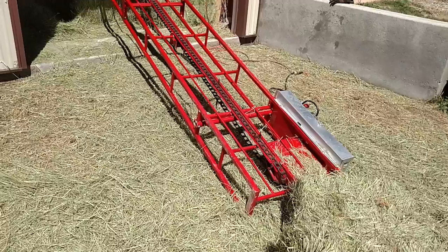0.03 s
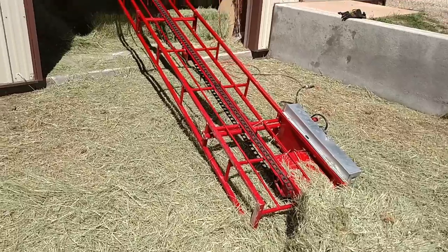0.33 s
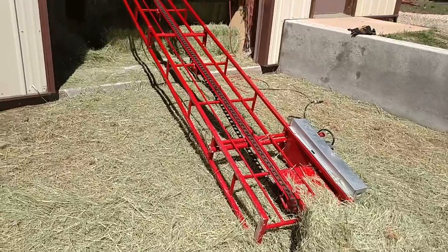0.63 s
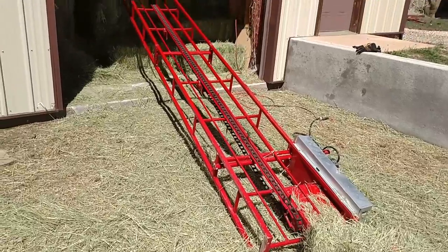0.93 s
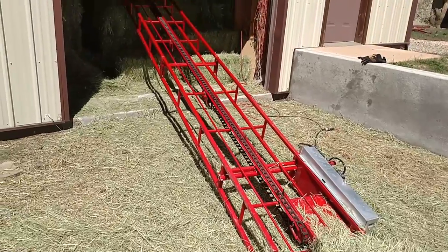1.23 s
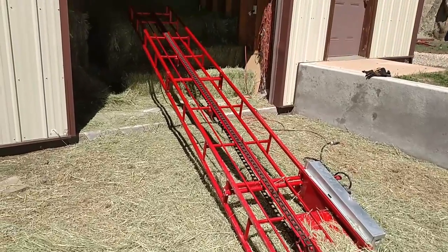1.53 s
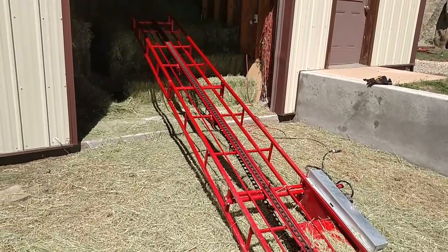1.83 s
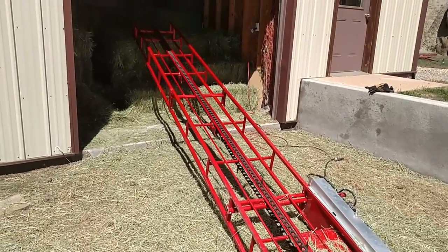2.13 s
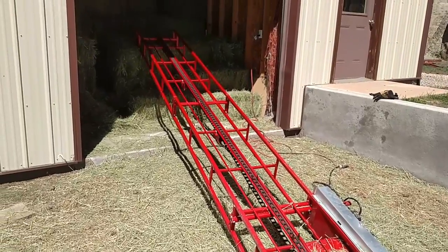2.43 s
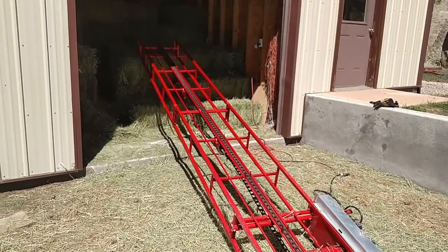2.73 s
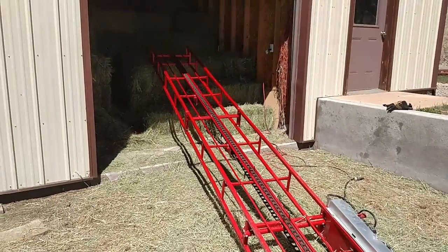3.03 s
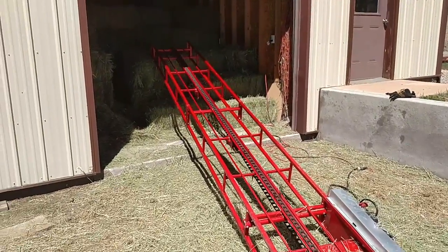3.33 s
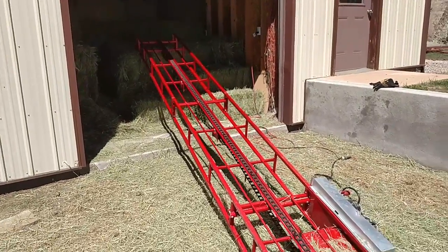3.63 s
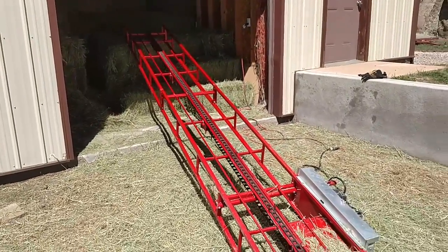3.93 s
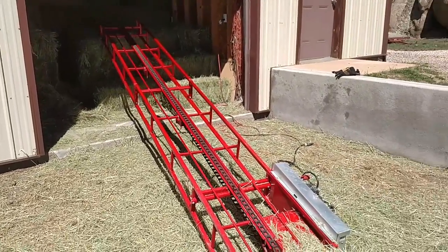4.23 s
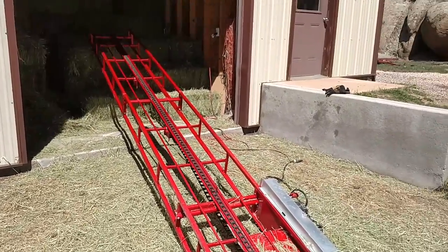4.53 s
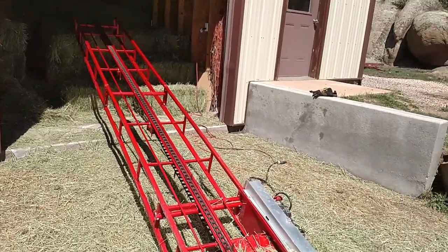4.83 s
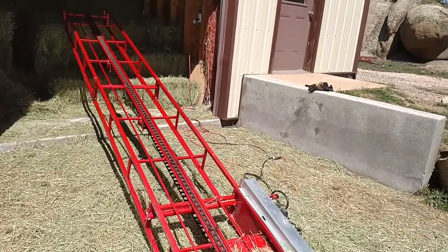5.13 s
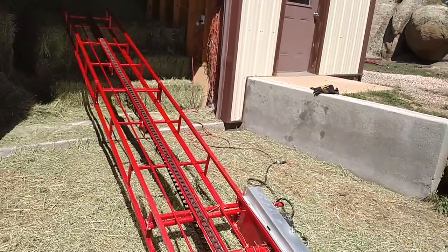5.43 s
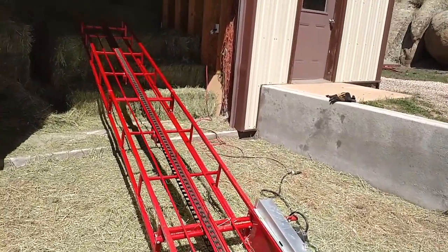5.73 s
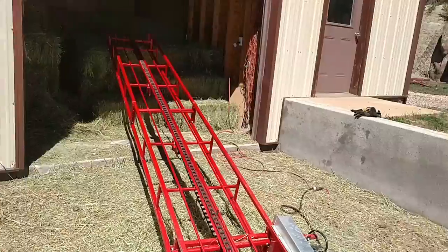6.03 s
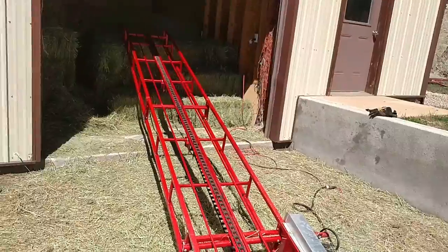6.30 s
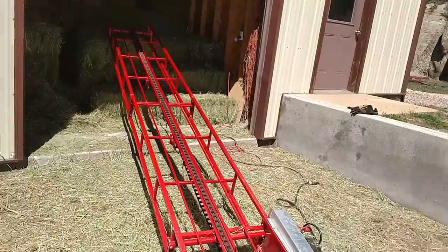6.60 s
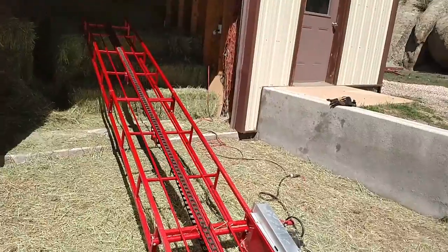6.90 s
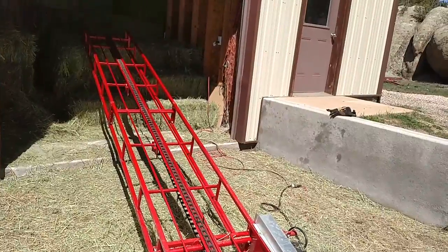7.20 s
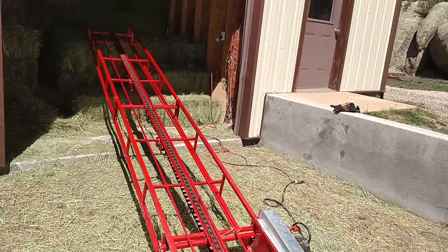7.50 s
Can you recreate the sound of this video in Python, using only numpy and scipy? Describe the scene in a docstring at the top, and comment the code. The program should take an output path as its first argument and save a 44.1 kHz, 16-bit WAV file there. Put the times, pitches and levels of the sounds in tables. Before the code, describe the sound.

A chain hay elevator runs empty with rapid, even steel clanks and jangling rattle, while wind gusts rumble on the microphone.

```python
"""Steel clanks six times a second: a chain hay elevator running empty in front of a barn.
Each link drops onto the sprocket, chatters, and knocks again on the return run; between blows the
pins chirp and the chain drags along the ringing steel frame. The microphone starts near the foot
of the elevator and moves to its side about three seconds in. Gusts of wind buffet it throughout."""
import sys
import numpy as np
from scipy import signal
from scipy.fft import rfft, irfft, next_fast_len
from scipy.io import wavfile
from scipy.ndimage import uniform_filter1d

SR = 44100
rng = np.random.default_rng(int(sys.argv[2]) if len(sys.argv) > 2 else 0)


def persist_wave(psi):
    """Save psi, clipped to +-1, as 16-bit WAV."""
    counts = np.round(np.clip(psi, -1, 1) * 32767).astype(np.int16)
    wavfile.write(sys.argv[1], SR, np.atleast_2d(counts).T)


N = 333396
BLOW_T = np.arange(8192) / SR  # seconds into one blow
ONSET_S = 0.085  # the breeze and the running noise start here

# The microphone's walk. Each row: time in seconds, position from 0 (foot) to 1 (side).
MIC_POSITION = [(2.9, 0.34), (3.7, 1)]

# Gusts on the microphone. Each row: start in seconds, length in seconds, relative level in dB.
GUST_EVENTS = [(0.086, 0.19, -40), (0.554, 0.052, -33.5), (1.153, 0.22, -28.5), (1.595, 0.24, -31),
               (1.924, 0.023, -30), (2.121, 0.67, -30), (2.837, .11, -21), (3.069, 0.19, -25),
               (3.244, 0.15, -35), (4.532, 0.41, -27), (5.169, 0.44, -27.5), (5.464, 0.58, -27.5),
               (6.202, 0.07, -33), (6.512, 0.8, -28.5), (7.084, 0.41, -26)]
# The strongest eddies. Each row: time of the peak in seconds, peak level in dB, pitch in Hz.
EDDY_EVENTS = [(1.184, -11, 130), (1.362, -10, 140), (1.501, -19.5, 150), (1.726, -12, 126),
               (2.229, -12, 145), (2.918, -16, 114), (3.148, -14, 136), (4.899, -12, 130),
               (5.523, -11.5, 126), (5.637, -11, 151), (5.697, -11.5, 131), (5.957, -13, 157),
               (5.974, -12.5, 185), (6.671, -14, 167), (6.712, -11.5, 155), (7.139, -7, 144),
               (7.348, -13.5, 161)]
# Wind on the microphone. Each row: frequency in Hz, relative level in dB.
WIND_SPECTRUM = [(15, -26), (50, 3.5), (120, 4.5), (180, -1), (280, -13), (420, -29.5), (700, -43),
                 (2000, -106.5)]

# Resonances of the steel frame. Each row: frequency in Hz, width in Hz, gain in dB.
FRAME_MODES = [(772, 34, 1.5), (927, 23.7, 6.5), (1067.6, 34.4, 4), (1193, 11, 3.5), (1359, 43, -0.5),
               (1568, 62, -5), (1662, 14, -4), (1825, 6.4, 1.5), (1933, 19, -7), (2166, 20, 1.5),
               (2275, 18, -1.5), (2420, 8.9, -12), (2627, 16, 3.5), (2847, 16, -4.5), (3770, 21, -2),
               (4510, 22, 0.5), (5430, 95, 4)]
# The chain dragging on its track. Each row: time in seconds, relative level in dB.
DRAG_LEVELS = [(2.5, -37.5), (2.9, -35.5), (4.3, -35), (5, -37.5), (6.2, -36), (6.6, -34)]
# The scrape of that drag. Each row: frequency in Hz, relative level in dB.
DRAG_SPECTRUM = [(40, -28), (200, -2.5), (400, -9), (600, -14), (750, -8), (950, 2), (1500, 2), (2200, -4),
                 (2900, -12), (3700, -11), (5500, -31.5), (8000, -50), (14000, -66)]

# Modes of a chain pin. Each row: frequency in Hz, relative level in dB.
PIN_RESONANCES = [(3500, 8), (5480, -5.5), (8500, -10), (11100, -19), (13200, -14.5)]
# When a bending pin chirps. Each entry: seconds after the landing.
CHIRP_DELAYS_S = [-0.0067, .051, .131]
# The brief scrape of a chirp. Each row: octaves from its pitch, relative level in dB.
CHIRP_SPECTRUM = [(-2.5, -52), (-0.37, -4), (0.044, 5), (0.21, -17), (0.93, -31)]
# Squeaks of dry pins. Each row: start in seconds, level in dB, pitch in Hz.
DRY_SQUEAKS = [(2.278, -27, 3360), (2.762, -35, 3530), (3.225, -38, 4820), (4.044, -38, 3360),
               (7.24, -37, 3520), (7.387, -36.5, 5460)]

# Modes of a link. Each row: frequency in Hz, relative dB at the foot and at the side, t60 in seconds.
LINK_RESONANCES = [(3550, 16.5, 13, 0.22), (3920, 14, 14.5, 0.057), (5010, -3, 11, 0.12),
                   (5630, -13, 2.5, 0.33), (5750, 4, 7.5, 0.18), (8640, -11, -13.5, 0.33),
                   (11040, -24, -13, 0.1), (13250, -31, -29, 0.22)]
# The bright jangle of a link. Each row: frequency in Hz, relative dB at the foot and at the side.
JANGLE_SPECTRUM = [(1200, -23, -22), (2470, -17, 11.5), (3330, 15, 1), (4470, 6, 5), (4450, -1.5, 8),
                   (5400, -12.5, 2.5), (5930, -4, 0.5), (6720, -9.5, -8), (9100, -16, -9),
                   (9850, -15, -24.5), (12900, -43, -32), (15200, -45, -44)]
# Links that slip back almost without a knock. Each entry: time of the landing in seconds.
GLIDING_LINKS_S = [2.473, 2.639, 2.959, 3.774, 4.915, 5.241, 6.055]
# How hard return knocks shake the frame. Each row: time in seconds, dB above the knock's own level.
SHAKE_LEVELS = [(3, 6), (4.1, 8), (5.1, 4.5), (6.1, 7.5), (6.5, 12.5)]
# The softer blow of a return knock on the frame. Each row: frequency in Hz, relative level in dB.
SHAKE_SPECTRUM = [(300, -15), (700, -30), (1300, -6), (1700, 3.5), (2500, -2), (3100, -13.5), (3700, -6.5),
                  (4300, -25.5), (5500, -25), (8000, -73)]
# The clank of a landing link. Each row: frequency in Hz, relative level in dB.
CLANK_SPECTRUM = [(300, -20), (700, -20), (1300, -13), (1650, 4.5), (2400, -1), (3000, -11), (4000, -26),
                  (8000, -48)]
# Links landing on the sprocket. Each row: start in seconds, relative dB of the clank and of the jangle.
LINK_LANDINGS = [(0.192, -37, -39.5), (0.354, -29.5, -31), (0.517, -27, -30), (0.68, -31.5, -31.5),
                 (0.843, -34.5, -34), (1.005, -28.5, -32.5), (1.167, -24.0, -32.5), (1.331, -30.0, -34.5),
                 (1.495, -26, -32), (1.657, -31.5, -33.0), (1.819, -30, -33.5), (1.982, -31.0, -33),
                 (2.147, -29.5, -31.5), (2.307, -28, -33), (2.471, -32, -37.0), (2.635, -32, -33.5),
                 (2.798, -29, -31.5), (2.96, -28.5, -32), (3.124, -28, -34.5), (3.285, -29, -36),
                 (3.448, -29, -36), (3.613, -24, -39.0), (3.775, -25, -34), (3.938, -24.5, -35.5),
                 (4.1, -24, -35), (4.263, -23.5, -35), (4.426, -24, -35.5), (4.589, -25, -34),
                 (4.751, -33, -34), (4.914, -31.5, -38), (5.078, -26, -29.5), (5.24, -24, -33.0),
                 (5.402, -25.5, -32.5), (5.565, -27, -31.5), (5.727, -29, -31.5), (5.891, -33.5, -34),
                 (6.054, -23.5, -32.5), (6.217, -25, -35.0), (6.38, -25.5, -33.5), (6.543, -24.5, -34),
                 (6.705, -24.5, -38), (6.87, -27.5, -37.5), (7.03, -24.0, -36.5), (7.193, -24.5, -37.5),
                 (7.357, -26.5, -40), (7.52, -26.5, -37.5)]
LANDING_TIMES_S = np.transpose(LINK_LANDINGS)[0]


def gain_of(db):
    """Decibels to amplitude."""
    return 10 ** (np.asarray(db) / 20)


def unit_rms(x):
    """Scales to rms 1."""
    return x / np.sqrt(np.mean(x ** 2) + 1e-20)


def at_time(rows, s):
    """Reads (seconds, value) rows at time s, joined by straight lines."""
    return np.interp(s, *np.transpose(rows))


def add(mix, s, sound):
    """Mixes a sound in at time s."""
    part = mix[max(round(s * SR), 0):][:len(sound)]
    part += sound[:len(part)]


def colour(x, spectrum, tilt_db=0):
    """Filters by (Hz, dB) rows, tilted by tilt_db an octave."""
    size = next_fast_len(len(x) + 2048)
    octave = np.log2(np.fft.rfftfreq(size, 1 / SR) + 1)
    hz, db = np.transpose(spectrum)
    knots = np.log2(hz)
    slope = tilt_db * (np.clip(octave, knots[0], knots[-1]) - knots.mean())
    return irfft(rfft(x, size) * gain_of(np.interp(octave, knots, db) + slope), size)[:len(x)]


def wander(hz):
    """Smooth random drift of rms 1, rolling off above hz."""
    lowpass = np.exp(-(np.fft.rfftfreq(N, 1 / SR) / hz) ** 2)
    return unit_rms(irfft(rfft(rng.standard_normal(N)) * lowpass, N))


def dying(t60, delay=0, rise=.0014):
    """Envelope of one contact: a quick rise after a delay, then a fall of 60 dB in t60 seconds."""
    t = np.maximum(BLOW_T - delay, 0)
    return (1 - np.exp(-t / rise)) * np.exp(-np.log(1000) * t / t60)


def wind_strength_db(attack_s=0.016, release_s=0.034, lull_db=-51.5):
    """Each gust rises, holds and dies back into a light breeze."""
    t = np.arange(N) / SR
    power = gain_of(lull_db) ** 2 * (t > ONSET_S)
    for start, length, db in GUST_EVENTS:
        attack = np.clip((t - start) / attack_s, 0, 1)
        release = np.exp(-np.maximum(t - start - length, 0) / release_s)
        power += (gain_of(db) * attack * release) ** 2
    return 10 * np.log10(power + 1e-12)


def eddies(width_cycles=0.56, steepness=0.7):
    """Single eddies roll past the microphone; the pressure wave steepens where each is strongest."""
    out, middle = np.zeros(N), BLOW_T.mean()
    for s, db, hz in EDDY_EVENTS:
        cycles = (BLOW_T - middle) * hz
        swell = np.exp(-abs(cycles / width_cycles) ** 1.77)
        angle = 2 * np.pi * (cycles + rng.random())
        add(out, s - middle, gain_of(db) * swell * np.sin(angle + steepness * swell * np.sin(angle)))
    return out


def wind(buffet_db=3.5, lump_db=6):
    """Air right on the microphone: lumpy turbulence, brighter in gusts, a deep rumble and eddies."""
    level_db = wind_strength_db() + buffet_db * np.minimum(wander(hz=16), .5)
    gust = np.clip((level_db + 34.5) / 18, 0, 1)
    air = rng.standard_normal(N) * gain_of(lump_db * np.tanh(wander(hz=103)))
    calm = unit_rms(colour(air, WIND_SPECTRUM, tilt_db=-1.5))
    strong = unit_rms(colour(air, WIND_SPECTRUM, tilt_db=5.5))
    turbulence = gain_of(level_db - 1.5) * ((1 - gust) * calm + gust * strong)
    rumble = unit_rms(colour(rng.standard_normal(N), [(10, 18.5), (28, 10), (55, 13.5), (200, -39)]))
    rumble_db = -45 + 0.44 * (level_db + 39.5)
    return turbulence + gain_of(rumble_db) * rumble + eddies()


def chain_drag(rough_db=1.5, flutter_db=1.6, ticks_per_s=260, hiss_db=-64):
    """The chain slides on its track: a fluttering scrape with small ticks in it, and a fine hiss."""
    slide = rng.standard_normal(N) * gain_of(rough_db * wander(hz=55) + flutter_db * wander(hz=32))
    ticks = rng.uniform(-0.72, 1, N) * (rng.random(N) < ticks_per_s / SR)
    contact = slide + 0.48 * unit_rms(ticks)
    hiss = unit_rms(colour(contact, [(2000, -14), (8400, -3.5), (10500, -13.5), (15500, -30)]))
    scrape = unit_rms(colour(contact, DRAG_SPECTRUM))
    scrape_db = at_time(DRAG_LEVELS, np.arange(N) / SR) - 1
    return gain_of(scrape_db) * scrape + gain_of(hiss_db) * hiss


def steel_frame(contacts, direct=0.81):
    """Contacts reach the microphone directly and also ring the tubes of the frame."""
    out = direct * contacts
    for hz, width, db in FRAME_MODES:
        radius = np.exp(-np.pi * width / SR)
        pole = radius * np.exp(2j * np.pi * hz / SR)
        out += 2 * gain_of(db) * signal.lfilter([1 - radius], [1, -pole], contacts).real
    return out


def steel_paths(place_s=1.3):
    """The dense ring of the steel for each link; its paths change slowly as the microphone moves."""
    paths = rng.standard_normal((int(N / SR / place_s) + 2, len(BLOW_T)))
    rings = []
    for s in LANDING_TIMES_S:
        place, part = divmod(s / place_s, 1)
        fade = part * np.pi / 2
        rings.append(np.cos(fade) * paths[int(place)] + np.sin(fade) * paths[int(place) + 1])
    return rings


def blow(envelope, spectrum, db, grain=0.42, ring=None, likeness=.93):
    """A burst of tiny uneven steel contacts, mostly the ring if given; db sets its loudest 25 ms."""
    contacts, sizes = rng.standard_normal((2, len(envelope)))
    if ring is not None:
        contacts = likeness * ring + np.sqrt(1 - likeness ** 2) * contacts
    unevenness = np.exp(grain * unit_rms(uniform_filter1d(sizes, size=40)))
    burst = colour(contacts * unevenness * envelope, spectrum)
    return gain_of(db) * burst / np.sqrt(uniform_filter1d(burst ** 2, size=SR // 40).max())


def ringing(modes, db, size, spread_db=3.5, detune=.009, radians_per_khz=.14):
    """A small steel part rings in close pairs of modes (Hz, dB, t60); its rattle roughens their phase."""
    out, t = np.zeros(size), BLOW_T[:size]
    rattle = radians_per_khz * unit_rms(uniform_filter1d(rng.standard_normal(size), size=60))
    for hz, mode_db, t60 in modes:
        level, shift, phase = rng.standard_normal((3, 2, 1))
        angle = 2 * np.pi * (hz * (1 + detune * shift) * t + phase) + rattle * hz / 1000
        pair = gain_of(spread_db * level) * np.sin(angle)
        out += gain_of(mode_db) * dying(t60)[:size] * pair.sum(0)
    return gain_of(db) * out / np.sqrt(np.mean(out[:SR // 40] ** 2))


def pin_ping(db, t60=.14):
    """A pin pings briefly as it slips."""
    return ringing([(hz, mode_db, t60) for hz, mode_db in PIN_RESONANCES], db, size=3000, detune=.018)


def pin_squeak(hz, db):
    """A dry pin sticks and slips: a rough scrape that peaks around hz."""
    octaves_db = [(-2, -45), (-.14, -15), (0, 0), (.12, -16), (1.2, -36), (2, -50)]
    return blow(dying(t60=0.11), [(hz * 2 ** octave, level) for octave, level in octaves_db], db)


def pins(chirp_db=-54, spread_db=2, chirp_hz=8000, side_db=-4, side_octaves=-0.13):
    """Bending pins chirp, fainter and lower from the side, and ping; dry ones squeak."""
    out = np.zeros(N)
    chirp = dying(t60=.024, rise=.003)[:SR // 20]
    for s in LANDING_TIMES_S[1:]:
        side = at_time(MIC_POSITION, s)
        db = chirp_db + side_db * side
        for lag in CHIRP_DELAYS_S:
            size, pitch, late, dryness = rng.standard_normal(4)
            hz = chirp_hz * 2 ** (side_octaves * side + .06 * pitch)
            spectrum = [(hz * 2 ** octave, level) for octave, level in CHIRP_SPECTRUM]
            add(out, s + lag + 0.00081 * late, blow(chirp, spectrum, db + spread_db * size))
            if lag > 0:  # a ping goes with each of the two chirps after the landing
                add(out, s + lag, pin_ping(db + 5 + 2 * spread_db * dryness))
    for s, db, hz in DRY_SQUEAKS:
        add(out, s, pin_squeak(hz, db))
        add(out, s, pin_ping(db - 11))
    click = blow(dying(t60=0.011), [(3000, 9), (14000, -9)], db=-39)
    add(out, 4.653, click)  # one tiny bright click
    return out


def link_ring(s, db):
    """A free link rings, as heard from where the microphone is at time s."""
    side = at_time(MIC_POSITION, s)
    modes = [(hz, foot_db + side * (side_db - foot_db), t60)
             for hz, foot_db, side_db, t60 in LINK_RESONANCES]
    return ringing(modes, db, size=len(BLOW_T))


def jangle_at_mic(s):
    """The spectrum of the jangle from where the microphone is at time s."""
    hz, foot_db, side_db = np.transpose(JANGLE_SPECTRUM)
    return np.column_stack([hz, foot_db + at_time(MIC_POSITION, s) * (side_db - foot_db)])


def return_knocks(lag_s=.0995, knock_db=-43, spread_db=2, glide_db=-11):
    """After each landing a slack link on the return run knocks, rings and bounces, shaking the frame."""
    jangles, shakes = np.zeros((2, N))
    half_cycle_s = np.diff(LANDING_TIMES_S).mean() / 2
    for s, ring in zip(LANDING_TIMES_S, steel_paths()):
        glides = any(abs(s - when) < half_cycle_s for when in GLIDING_LINKS_S)
        db = knock_db + spread_db * rng.standard_normal() + glide_db * glides
        bounce = dying(t60=0.051, delay=rng.uniform(0.028, 0.0394))
        rattle = dying(t60=0.37) + 0.76 * dying(t60=0.036) + 0.62 * bounce
        add(jangles, s + lag_s, link_ring(s, db - 2))
        add(jangles, s + lag_s, blow(rattle, jangle_at_mic(s), db - 1.5, ring=ring))
        add(shakes, s + lag_s, blow(rattle, SHAKE_SPECTRUM, db + at_time(SHAKE_LEVELS, s), ring=ring))
    return jangles, shakes


def catching_link(start_s=3.613):
    """One link catches harder than the rest and jolts the whole elevator."""
    out = np.zeros(N)
    thump_spectrum = [(200, 4), (600, -4), (1100, -6), (1800, -7), (5000, -58)]
    add(out, start_s, blow(dying(t60=0.033), thump_spectrum, db=-30))
    return out


def sprocket_clanks():
    """Each link lands hard, rings the same steel and bounces; its bright jangle peaks just after."""
    out = np.zeros(N)
    strike = 1.08 * dying(t60=0.045, rise=0.0008) + 0.26 * dying(t60=0.039, delay=0.018)
    jangle = 1.14 * dying(t60=0.024, delay=0.0023) + 0.98 * dying(t60=0.29, rise=0.0029)
    for (s, clank_db, jangle_db), ring in zip(LINK_LANDINGS, steel_paths()):
        bounce = dying(t60=0.079, delay=0.0363 + 0.0018 * rng.standard_normal())
        landing = strike + 0.68 * dying(t60=0.34) + 0.4 * bounce
        add(out, s, blow(landing, CLANK_SPECTRUM, clank_db - 1, grain=0.18, ring=ring))
        add(out, s, blow(jangle, jangle_at_mic(s), jangle_db - 1, grain=0.21, ring=ring))
        add(out, s, link_ring(s, jangle_db - 5.5))
    return out


def scene(swell_s=0.14):
    """One microphone in the wind: the running noise swells in under the clanks of the sprocket."""
    jangles, shakes = return_knocks()
    running = steel_frame(shakes + catching_link() + chain_drag()) + jangles + pins()
    swell = 1 - np.exp(-np.maximum(np.arange(N) / SR - ONSET_S, 0) / swell_s)
    return (steel_frame(sprocket_clanks()) + swell * running + wind())[None]


def record(dry):
    """The recorder's band limit."""
    lowpass = signal.firwin(511, cutoff=15550, window=("kaiser", 9), fs=SR)
    return signal.oaconvolve(dry, lowpass[None], "same")


dry = scene()
out = record(dry)
persist_wave(out)
```